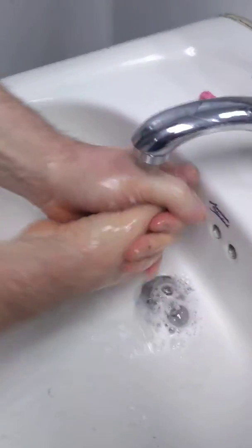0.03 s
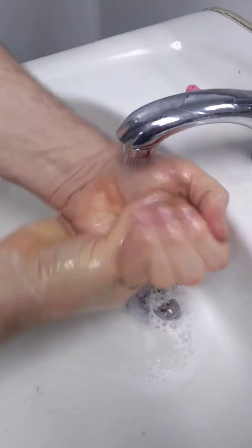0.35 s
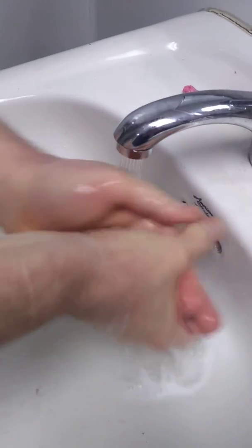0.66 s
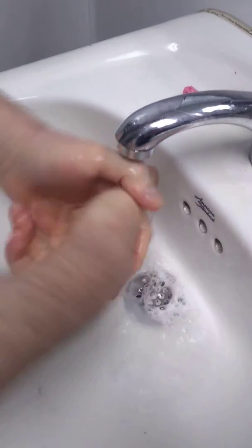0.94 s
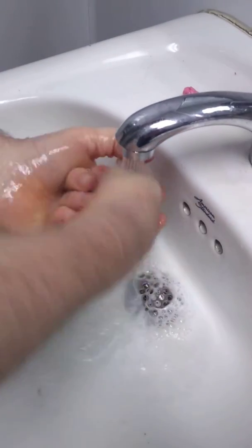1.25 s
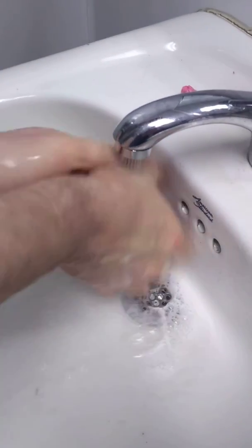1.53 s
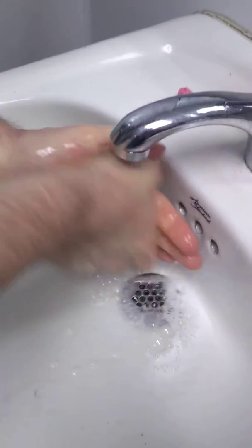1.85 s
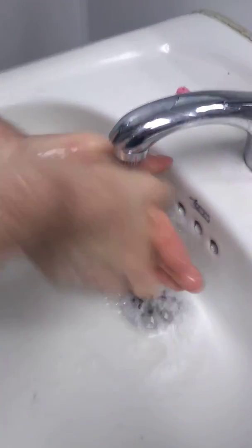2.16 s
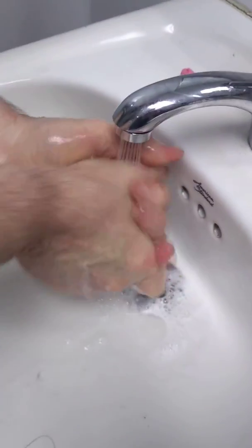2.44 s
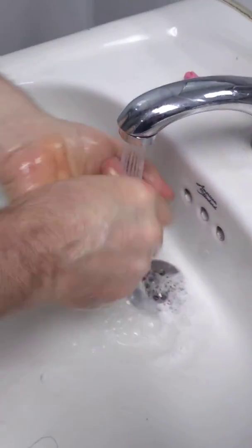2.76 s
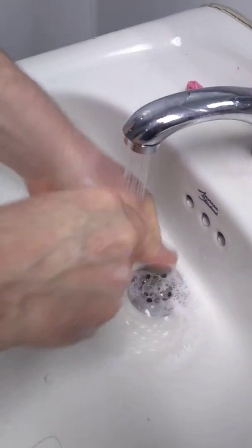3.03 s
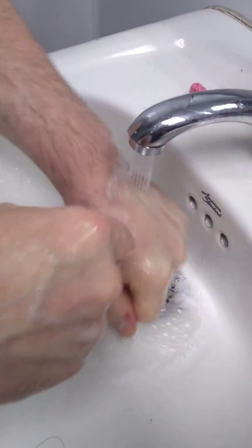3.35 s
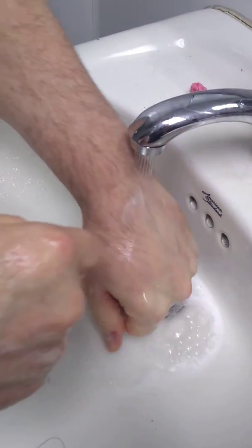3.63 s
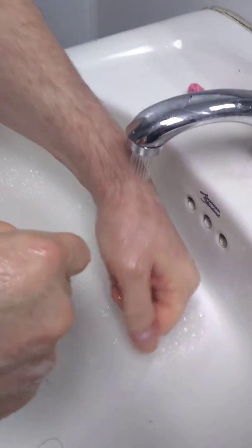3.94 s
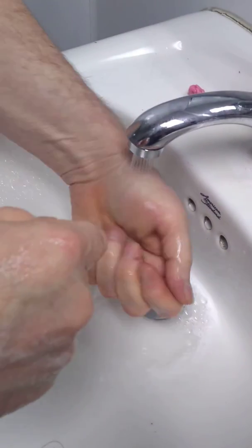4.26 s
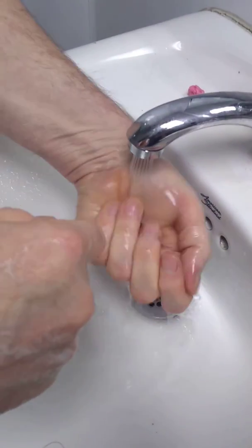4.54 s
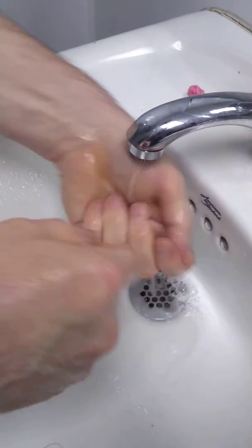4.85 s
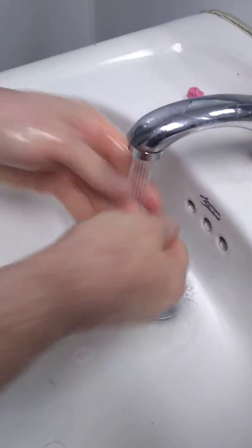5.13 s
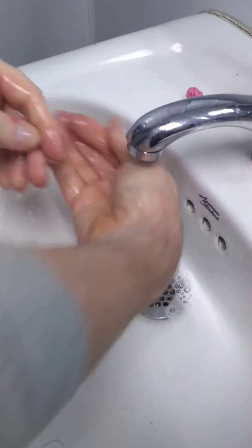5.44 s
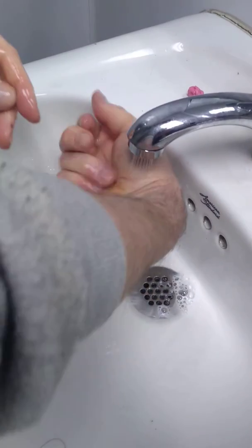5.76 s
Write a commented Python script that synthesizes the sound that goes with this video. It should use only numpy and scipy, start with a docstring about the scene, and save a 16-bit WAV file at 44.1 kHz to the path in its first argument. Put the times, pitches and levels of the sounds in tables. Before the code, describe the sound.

Heard from just above a ceramic sink in a small washroom, tap water fizzes continuously on a pair of hands. Uneven splashes, heavy drops and hollow gurgles fill the first half, broken by two quick knocks slightly to the left and a few bubbly plops. Afterwards the stream carries on a little quieter, with scattered drips and low gushes as water plunges into the basin.

```python
"""A tap hisses on hands being rinsed over a ceramic basin, close up in a small washroom.
Tiny bubbles in the aerated jet burst on the skin; water spills off, patters on the basin, gushes into
the pool with a sinking boom and plops as air pockets close. Two sharp knocks sound close by on the left.
The microphone is just above the basin: two ports, subtracted from each other for stereo."""
import sys
import numpy as np
from scipy import signal
from scipy.fft import rfft, irfft
from scipy.io import wavfile
from scipy.ndimage import uniform_filter1d

SR = 44100
rng = np.random.default_rng(int(sys.argv[2]) if len(sys.argv) > 2 else 0)


def master_out(mix):
    """Clip the mix to full scale and print it as 16-bit PCM to the path in sys.argv[1]."""
    frames = np.transpose(np.atleast_2d(mix))
    ceiling = np.clip(frames, -1, 1)
    pcm = np.round(ceiling * 32767).astype(np.int16)
    wavfile.write(sys.argv[1], SR, pcm)


N = 259749

# the jet on the hands, louder and further left until the second knock: t/s, level/dB, left-right/dB
JET_FLOW = [(0.0, -39, 3.0), (0.13, -38.5, 5), (0.43, -40, 1.5), (0.72, -38.5, 5.5), (0.92, -38, 3.5),
            (1.36, -40, 4.5), (2.13, -36.5, 4), (2.23, -39, 3), (2.29, -40, 0), (2.61, -42, -1),
            (4.38, -42.5, -1), (4.5, -42, -2), (5.58, -43, 0.5), (5.89, -42.5, -3)]
# colour of the hiss: f/Hz, gain/dB
HISS_SPECTRUM = [(300, -5.5), (1200, -22.5), (3000, -19), (3900, -29), (4700, -10), (5200, -6.5),
                 (6500, -8.5), (8000, -2), (9200, 1), (10000, 4.5), (11600, 5), (12400, 1.5), (13300, -8),
                 (14400, -3.5)]
# resonances in the hiss: f/Hz, width/Hz, gain/dB
HISS_PEAKS = [(3050, 80, 6), (5710, 630, 4), (7960, 130, 5), (11090, 220, 3)]
# handfuls spilling into the basin: peak t/s, level/dB
SPILLS = [(0.05, -55), (0.45, -61.5), (0.95, -56.5), (1.252, -61), (1.5, -59), (1.85, -55.5),
          (2.168, -51.5), (2.58, -61), (2.85, -77)]
# colour of water washing over the basin: f/Hz, gain/dB
RUNOFF_SPECTRUM = [(25, -42), (60, 11.5), (150, 14.5), (400, 10.5), (750, 8), (1200, 2.5), (1700, 4),
                   (3000, 2.5), (4500, -5), (7000, 3), (10000, -37), (14000, -55)]
# the flow ringing hollow: t/s, level/dB, lower f/Hz, upper f/Hz, upper gain/dB, lower width/Hz, gurgle/dB
HOLLOWS = [(0.0, -43.5, 466, 745, -6, 95, 3), (5.66, -52.5, 479, 790, 0, 65, 2)]
# colour of the room tone: f/Hz, gain/dB
DRONE_SPECTRUM = [(20, -37), (38, -48), (60, 1), (82, -36), (115, -1.5), (150, -6), (250, -11.5),
                  (500, -7.5), (1000, -65), (3000, -87)]
# low modes of the room: f/Hz, width/Hz, gain/dB
ROOM_MODES = [(62, 7, 17), (114, 8, 8), (166, 10, 4)]
# heavy drops on skin or basin: t/s, peak level/dB, centre f/Hz, spray decay/ms
HEAVY_DROPS = [(.218, -30, 2400, 4), (.566, -33, 5200, 1), (.813, -32, 5000, 1), (.907, -33, 5500, 1),
               (.9233, -28, 3500, 1.5), (1, -31, 1300, 3), (1.045, -29, 1900, 3), (1.226, -31, 4600, 1),
               (1.2335, -30, 600, 4), (1.2352, -17, 5900, 1.3), (1.24, -29, 4800, 5), (1.486, -29, 3400, 3),
               (1.557, -31, 1380, 3), (1.558, -32, 5400, 1), (1.739, -31, 5300, 1), (1.756, -27, 1500, 3),
               (2.013, -30, 1200, 3), (2.046, -25, 550, 3), (2.057, -29, 700, 3), (2.067, -29, 1200, 3),
               (2.092, -27, 5500, 2), (2.135, -28, 6000, 2), (2.18, -28, 5200, 2), (2.319, -33, 700, 3),
               (2.384, -29, 3600, 2), (2.413, -29, 1430, 3), (2.421, -31, 1500, 3), (2.448, -35, 480, 3),
               (2.499, -33, 5000, 1), (2.517, -32, 800, 3), (2.519, -31, 3700, 3), (2.58, -31, 3400, 4),
               (2.622, -29, 3000, 5), (2.704, -28, 5400, 3), (2.787, -35, 800, 3), (2.96, -35, 1400, 3),
               (4.655, -41, 3100, 4), (4.972, -39, 5100, 1), (5.155, -39.5, 3000, 2), (5.337, -33, 4200, 3)]
# the jet plunging into the pool: peak t/s, rise/s, fall/s, level/dB, foam f/Hz, glide/(octaves per s)
GUSHES = [(0.699, .06, .12, -41, 244, -3.5), (1.135, 0.03, 0.06, -53.5, 125, -3),
          (1.72, 0.085, 0.12, -40.5, 135, -15), (2.8, 0.41, 0.42, -56.5, 66, -2.5),
          (2.91, 0.13, 0.069, -48.5, 670, 7), (3.385, 0.059, 0.11, -51.5, 960, -1.5),
          (4.09, 0.075, 0.053, -48, 775, 1), (4.172, 0.069, 0.19, -37.5, 172, -9.5),
          (4.23, .05, 0.058, -46, 58, 0), (4.52, 0.064, 0.19, -48.5, 58.5, 8),
          (4.68, 0.032, 0.1, -58.5, 696, -1), (4.9, 0.065, 0.065, -53.5, 66.4, -5)]
# how well the foam radiates: f/Hz, gain/dB
FOAM_RADIATION = [(25, -52), (43, -4), (62, 12.5), (85, -4), (240, 0.5), (350, -2), (1000, -2.5),
                  (1600, -5.5), (3000, -3), (6000, -14)]
# the gushes at the two ports: f/Hz, coherence/(0-1); and f/Hz, lead of the left port/rad
BOOM_ALIKE, BOOM_LEAD = [(65, 0.81), (120, 1), (180, 0.33)], [(50, 0.7), (118, 1.47), (170, 0.31)]
# air pockets, large in the basin and small on the hands:
# t/s, peak level/dB, f/Hz, swell/s, t60/s, rise/(share of f), splash over the peak/dB
PLOPS = [(2.538, -38, 390, .0032, .04, -.2, -3), (2.578, -30, 345, .0015, .028, .1, -5),
         (2.61, -27, 590, .009, .016, .75, -8), (2.697, -33, 1143, .002, .03, .15, -2),
         (2.725, -38, 720, .0026, .035, -.1, -3), (1.105, -44, 115, .02, .16, .2, -14),
         (1.486, -37, 3550, .002, .009, .1, -2), (5.3365, -46, 3100, .001, .03, .15, 3),
         (5.481, -48, 3200, .001, .022, .06, 4)]
# thin squirts: t/s, length/s, level/dB, f/Hz, climb/(Hz per s), width/Hz
SQUIRTS = [(1.453, .035, -46, 7950, 3000, 700), (2.046, .03, -34.5, 7800, 6000, 1200),
           (2.074, 0.18, -41.5, 8050, 5030, 1600)]
# contacts within the two knocks: t/s, level over the first 6 ms/dB, cutoff f/Hz, factor on t60
KNOCK_CONTACTS = [(2.0223, -33, 900, 0.58), (2.027, -39, 695, 0.78), (2.03, -27.5, 1950, 0.2),
                  (2.0357, -20, 6760, .85), (2.2596, -36, 2930, 0.66), (2.2616, -24, 3070, 0.64),
                  (2.2651, -24, 3370, 1), (2.2771, -31, 880, 0.5)]
# what the knocks ring with: f/Hz, level/dB, t60/s
KNOCK_MODES = [(275, -4, .035), (333, -1, .06), (429, -3, .06), (525, -8, .035), (707, -2, .04),
               (942, -9, .025), (1096, -7, .026), (1413, -1.5, .018), (1583, -11, .03), (2330, -8, .018),
               (2790, -5, .028), (3050, -2, .038), (4300, -3, .014), (4813, -4, .028), (5060, 3, .028),
               (5700, -5, .013)]
# reverberation of the washroom: f/Hz, t60/s
ROOM_DECAY = [(100, 0.29), (500, 0.12), (2000, 0.23), (8000, 0.035), (14000, 0.0075)]
# how much of the opposite port the microphone subtracts: f/Hz, share/(0-1)
CROSSFEED = [(100, 0.14), (400, 0.3), (1000, 0.47), (2000, 1), (4200, 1), (5300, 1), (6400, 0.5),
             (7400, 0.39), (8600, 0.1), (14000, 0.1)]


def gain_of(db):
    """Decibels to amplitude."""
    return 10 ** (np.asarray(db) / 20)


def unit_rms(x):
    """Scales to rms 1."""
    return x / np.sqrt(np.mean(x ** 2) + 1e-20)


def read(points, hz):
    """Reads a spectrum on a log-frequency axis."""
    f, value = np.transpose(points)
    return np.interp(np.log(hz + 1), np.log(f + 1), value)


def follow(rows):
    """The columns of a curve, sample by sample."""
    s, *columns = np.transpose(rows)
    return [np.interp(np.arange(N) / SR, s, c) for c in columns]


def coloured(x, db_at):
    """Filters by a gain in dB given as a function of frequency."""
    return irfft(rfft(x) * gain_of(db_at(np.fft.rfftfreq(x.shape[-1], 1 / SR))), x.shape[-1])


def humps(peaks, hz):
    """The dB lift of a set of resonances."""
    return sum(db / (1 + (2 * (hz - centre) / width) ** 2) for centre, width, db in peaks)


def resonance(hz, centre, width):
    """Gain in dB of one steep-sided resonance."""
    return -20 * np.log10(1 + (2 * (hz - centre) / width) ** 2)


def panned(x, side_db):
    """Shares a sound between the two ports; positive is left."""
    return x * gain_of(np.array([[1], [-1]]) * side_db / 2)


def from_left(x, lag_s):
    """A sound from the left reaches the right port later."""
    hz = np.fft.rfftfreq(N, 1 / SR)
    return np.array([x[0], irfft(rfft(x[1]) * np.exp(-2j * np.pi * hz * lag_s), N)])


def add(mix, s, sound):
    """Adds a sound at time s."""
    part = mix[..., round(s * SR):][..., :sound.shape[-1]]
    part += sound[..., :part.shape[-1]]


def wander(per_s):
    """A slow random curve of rms 1."""
    return unit_rms(coloured(rng.standard_normal(N), lambda hz: -20 * np.log10(1 + (hz / per_s) ** 4)))


def patchy_noise(patchy_db, flicker_db):
    """Noise at both ports with drifting patches of colour and a quick shared flicker."""
    frames = N // 128 + 5
    re, im, patches = rng.standard_normal((3, 2, frames, 257))
    patches = unit_rms(uniform_filter1d(uniform_filter1d(patches[0], size=14, axis=0), size=7, axis=1))
    flicker = unit_rms(uniform_filter1d(rng.standard_normal(frames), size=5))[:, None]
    spectra = (re + 1j * im) * gain_of(patchy_db * patches + flicker_db * flicker)
    return signal.istft(spectra.swapaxes(1, 2), nperseg=512, noverlap=384)[1][:, :N]


def impacts(per_s, spread_db):
    """Random clicks at each port: many small, a few large."""
    size = gain_of(spread_db * np.minimum(rng.exponential(1, (2, N)), 4))
    return size * rng.choice([-1, 1], (2, N)) * (rng.random((2, N)) < per_s / SR)


def jet(gain_db=2.5, rubs_per_s=2.3, rub_db=0.25, rub_side_db=0.4):
    """Countless tiny bubbles burst on the skin; rubbing hands sway the hiss in level and side."""
    flow_db, side_db = follow(JET_FLOW)
    fizz = unit_rms(patchy_noise(patchy_db=2.0, flicker_db=0.34))
    fizz += 0.34 * unit_rms(impacts(per_s=6700, spread_db=6.0))
    hiss = unit_rms(coloured(fizz, lambda hz: read(HISS_SPECTRUM, hz) + humps(HISS_PEAKS, hz)))
    hiss *= gain_of(flow_db + gain_db + rub_db * wander(rubs_per_s))
    return panned(hiss, side_db + rub_side_db * wander(rubs_per_s))


def bubble(hz, swell, t60, rise):
    """An air pocket rings and glides in pitch, climbing as it nears the surface if rise is positive."""
    t = np.arange(int((swell + t60) * SR)) / SR
    attack = np.sin(np.pi / 2 * np.minimum(t / swell, 1)) ** 2
    decay = gain_of(-60 * np.maximum(t - swell, 0) / t60)
    return attack * decay * np.sin(2 * np.pi * hz * (t + rise * t ** 2 / (2 * (swell + t60))))


def ticks(per_s=90, under_flow_db=8, spread_db=9, low_hz=2800, high_hz=6500):
    """Fine droplets thrown off by the jet tick on skin and basin, each at its own pitch."""
    out, (flow_db, _) = np.zeros((2, N)), follow(JET_FLOW)
    for when, pitch, softness, ring, side in rng.random((round(per_s * N / SR), 5)):
        hz = low_hz * (high_hz / low_hz) ** pitch
        tick = bubble(hz, swell=1 / hz, t60=(8 + 40 * ring) / hz, rise=.2)
        db = flow_db[int(when * N)] - under_flow_db - spread_db * np.sqrt(softness)
        add(out, when * N / SR, panned(gain_of(db) * tick, side_db=16 * (side - .5)))
    return out


def runoff_flow(trickle_db=-69.5, rise_s=0.15, fall_s=0.18):
    """Amplitude of the water reaching the basin: spills swell and drain over a steady trickle."""
    t, power = np.arange(N) / SR, gain_of(trickle_db) ** 2
    for s, db in SPILLS:
        power = power + gain_of(db) ** 2 * np.exp(-((t - s) / np.where(t < s, rise_s, fall_s)) ** 2)
    return np.sqrt(power)


def small_bubbles(per_s, cycles, sizes=28, tries=120):
    """Trapped bubbles of many sizes chirp at random moments."""
    out = np.zeros((2, N))
    for hz in np.geomspace(400, 7000, sizes):
        chirp = bubble(hz, swell=1 / hz, t60=cycles / hz, rise=0.4) * np.sqrt(hz)
        for when, strength, side, chance in rng.random((tries, 4)):
            if chance < per_s * N / SR / sizes / tries:
                add(out, when * N / SR, panned(chirp * gain_of(9.9 * strength ** 3), 24 * (side - .5)))
    return unit_rms(out)


def runoff(gain_db=9, bubbles_db=-9):
    """Water leaving the hands washes over the basin, patters on it and traps small bubbles."""
    wash = unit_rms(patchy_noise(patchy_db=3, flicker_db=1.8))
    patter = unit_rms(impacts(per_s=500, spread_db=5))
    bubbles = gain_of(bubbles_db) * small_bubbles(per_s=300, cycles=16)
    water = unit_rms(coloured(wash + patter, lambda hz: read(RUNOFF_SPECTRUM, hz))) + bubbles
    return panned(water * runoff_flow() * gain_of(gain_db), side_db=2.5)


def hollow_ring(attack_s=.012, fade_db_per_s=42, pitch_waver=.022, gurgles_per_s=32):
    """The flow gurgles through two wavering resonances of a cavity, in uneven lumps that fade."""
    out, t = np.zeros(N), np.arange(SR) / SR
    shape = np.minimum(t / attack_s, 1) * gain_of(-fade_db_per_s * t)
    knots = np.linspace(0, 1, gurgles_per_s)
    for s, db, lower_hz, upper_hz, upper_db, lower_width, gurgle_db in HOLLOWS:
        for centre, share_db in ((lower_hz, 0), (upper_hz, upper_db)):
            width = lower_width * centre / lower_hz
            ring = coloured(rng.standard_normal(SR), lambda hz: resonance(hz, centre, width))
            waver, lumps = (np.interp(t, knots, r) for r in rng.standard_normal((2, gurgles_per_s)))
            warped_t = np.cumsum(1 + pitch_waver * waver) / SR
            gurgle = np.interp(warped_t, t, ring) * gain_of(gurgle_db * np.tanh(lumps))
            add(out, s, gain_of(db + share_db) * shape * unit_rms(gurgle))
    return out


def room_tone(level_db=-59, apart=0.8):
    """A low drone stands in the lowest modes of the room."""
    own, shared = rng.standard_normal((2, N)), rng.standard_normal(N)
    drone = coloured(apart * own + shared, lambda hz: read(DRONE_SPECTRUM, hz) + humps(ROOM_MODES, hz))
    return gain_of(level_db) * unit_rms(drone)


def splat(centre_hz, spray_ms, octaves=1.3):
    """One drop lands: a slap and a brief burst of spray round its own pitch, with peak 1."""
    t = np.arange(2048) / SR
    slap = 2.5 * np.exp(-t / .0001)  # alike at both ports
    spray = rng.standard_normal((2, len(t))) * np.exp(-1000 * t / spray_ms)
    edges = np.clip(centre_hz * 2 ** (np.array([-1, 1]) * octaves / 2), 20, SR / 3)
    burst = signal.sosfilt(signal.butter(2, edges, "bandpass", fs=SR, output="sos"), slap + spray)
    return burst / abs(burst).max()


def drops(drips_per_s=14, over_flow_db=23, low_hz=800, high_hz=2600, tries=100):
    """Heavy drops slap skin or basin; random drips between them follow the runoff in strength."""
    out, flow = np.zeros((2, N)), runoff_flow()
    for s, db, centre_hz, spray_ms in HEAVY_DROPS:
        add(out, s, gain_of(db) * splat(centre_hz, spray_ms))
    for when, pitch, softness, chance in rng.random((tries, 4)):
        drip = splat(low_hz * (high_hz / low_hz) ** pitch, spray_ms=3)
        if chance < drips_per_s * N / SR / tries:
            add(out, when * N / SR, drip * flow[int(when * N)] * gain_of(over_flow_db - 10 * softness))
    return from_left(out, lag_s=.00003)


def gushes(grain=0.82, lowest_hz=54, above_db_per_octave=3.5, below_db_per_octave=7.5):
    """Foam churns in the pool, mostly sinking in pitch as it grows, and sets the room modes booming."""
    churn = unit_rms(rng.standard_normal((2, N)) + grain * unit_rms(impacts(per_s=350, spread_db=1.0)))
    hz, t, (left, other) = signal.stft(churn, SR, nperseg=1024)
    hz, power = np.maximum(hz, 10)[:, None], 0
    for s, rise, fall, db, foam_hz, glide in GUSHES:
        pitch_hz = np.maximum(foam_hz * 2 ** (glide * np.clip(t - s, -1, 1)), lowest_hz)
        octaves = np.log2(hz / pitch_hz)
        slope_db = np.minimum(-above_db_per_octave * octaves, below_db_per_octave * octaves)
        swell = np.exp(-np.where(t < s, ((t - s) / rise) ** 4, ((t - s) / fall) ** 2))
        power = power + gain_of(db + slope_db) ** 2 * swell
    alike = np.clip(read(BOOM_ALIKE, hz), 0, 1)
    right = (alike * left + np.sqrt(1 - alike ** 2) * other) * np.exp(-1j * read(BOOM_LEAD, hz))
    density = power * SR / (2 * np.log(2) * hz)  # spreads each octave's power over its width
    amplitude = np.sqrt(density) * gain_of(read(FOAM_RADIATION, hz))
    foam = signal.istft(np.array([left, right]) * amplitude, nperseg=1024)[1][:, :N]
    boom = sum((gain_of(db) - 1) * signal.lfilter(*signal.iirpeak(f, f / width, SR), foam)
               for f, width, db in ROOM_MODES)
    return foam + boom


def plops():
    """Closing air pockets gulp and ping in the water, each throwing up a splash."""
    out = np.zeros((2, N))
    for s, db, hz, swell, t60, rise, splash_db in PLOPS:
        add(out, s, gain_of(db) * bubble(hz, swell, t60, rise))
        add(out, s + swell, gain_of(db + splash_db) * splat(hz, spray_ms=6, octaves=2.2))
    return panned(out, side_db=0.5)


def squirts(attack_s=.005):
    """A hand pinches the jet: a narrow band of spray starts quickly, climbs in pitch and dies away."""
    out = np.zeros((2, N))
    for s, length, db, hz, climb, width in SQUIRTS:
        t = np.arange(round(2 * length * SR)) / SR
        band = unit_rms(coloured(rng.standard_normal((2, SR)), lambda f: resonance(f, hz, width)))
        spray = (signal.hilbert(band[:, :len(t)]) * np.exp(1j * np.pi * climb * t ** 2)).real
        shape = np.minimum(t / attack_s, 1) * np.exp(-(t / length) ** 4)
        add(out, s, gain_of(db) * shape * spray)
    return out


def knocks(push_s=.00035, crack_s=.003, detune=.012):
    """Close on the left, each contact is a push, a crack and damped modes; softer ones sound duller."""
    out, t = np.zeros((2, N)), np.arange(4096) / SR
    push = 3 * (1 - t / push_s) * np.exp(-t / push_s)
    for s, db, cutoff_hz, ring in KNOCK_CONTACTS:
        tuning = 1 + detune * rng.standard_normal(len(KNOCK_MODES))
        modes = 0
        for k, (hz, mode_db, t60) in enumerate(KNOCK_MODES):  # neighbours swing opposite ways
            decay = gain_of(mode_db - 60 * t / (t60 * ring))
            modes += (-1) ** k * decay * np.sin(2 * np.pi * hz * tuning[k] * t)
        crack = 1.9 * rng.standard_normal((2, len(t))) * np.exp(-t / crack_s)
        lowpass = signal.butter(6, min(cutoff_hz, SR / 3), fs=SR, output="sos")
        blow = signal.sosfilt(lowpass, push + modes + crack)
        add(out, s, gain_of(db) * blow / blow[:, t < .006].std())
    return panned(from_left(out, lag_s=.00005), side_db=4)


def washroom(x, density=.08, gap_samples=200):
    """Dense reflections from near, hard walls, each band dying at its own speed."""
    n = SR // 2
    echoes = rng.standard_normal((2, n)) * (rng.random((2, n)) < density) * (np.arange(n) > gap_samples)
    hz, t, spectra = signal.stft(echoes, SR, nperseg=256)
    decay = gain_of(-60 * t / read(ROOM_DECAY, hz)[:, None])
    tail = signal.istft(spectra * decay, SR, nperseg=256)[1]
    return signal.fftconvolve(x, tail / np.linalg.norm(tail[0]), axes=1)[:, :N]


def scene(water_wet_db=-9, knock_wet_db=-16):
    """Water, knocks and room as they reach the two ports above the basin."""
    water = runoff() + drops() + ticks() + plops() + squirts() + hollow_ring()
    bumps = knocks()
    direct = jet() + gushes() + water + bumps
    return direct + room_tone() + washroom(gain_of(water_wet_db) * water + gain_of(knock_wet_db) * bumps)


def record(dry, port_lag_s=.000474, edge_hz=14270):
    """The microphone: each channel is one port minus a share of the other, delayed; the top is cut."""
    hz, ports = np.fft.rfftfreq(N, 1 / SR), rfft(dry)
    share = np.clip(read(CROSSFEED, hz), 0, 1)
    opposite = np.exp(-2j * np.pi * hz * port_lag_s) * ports[::-1]
    pair = irfft((ports - share * opposite) / np.sqrt(1 + share ** 2), N)
    lowpass = signal.firwin(801, edge_hz, window=("kaiser", 9), fs=SR)
    return signal.oaconvolve(pair, lowpass[None], "same")


dry = scene()
out = record(dry)
master_out(out)
```